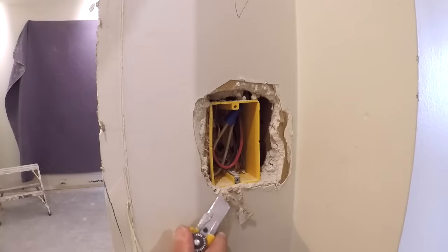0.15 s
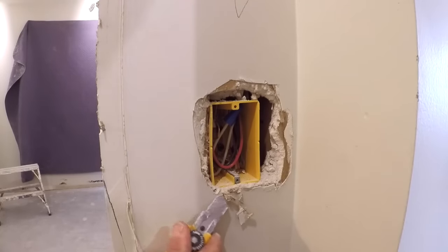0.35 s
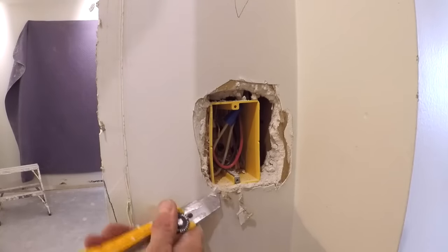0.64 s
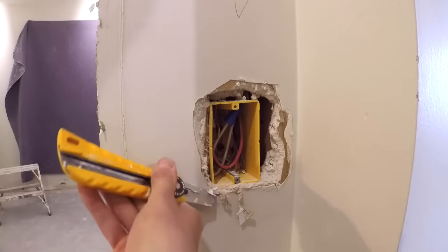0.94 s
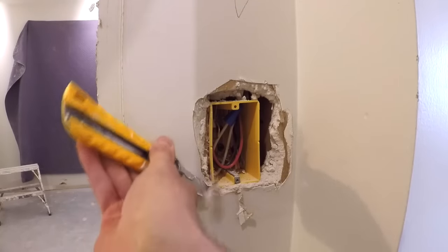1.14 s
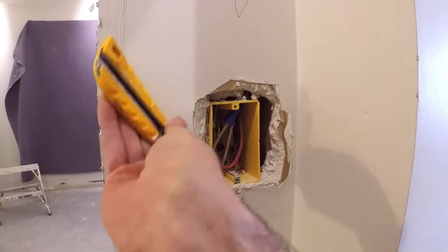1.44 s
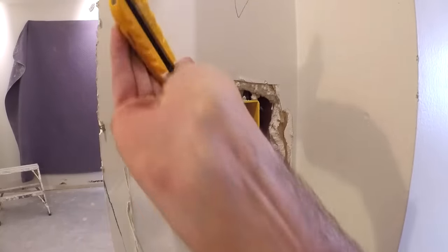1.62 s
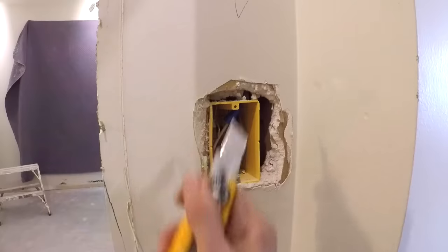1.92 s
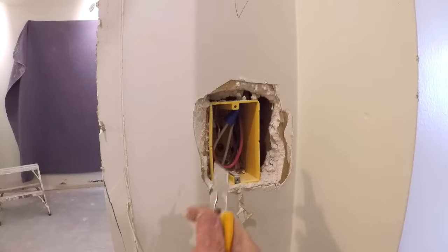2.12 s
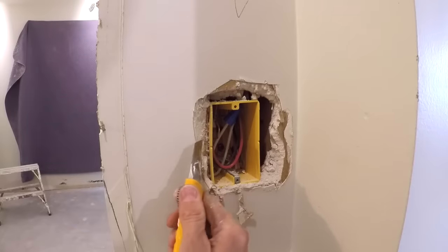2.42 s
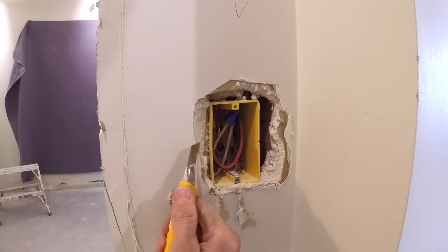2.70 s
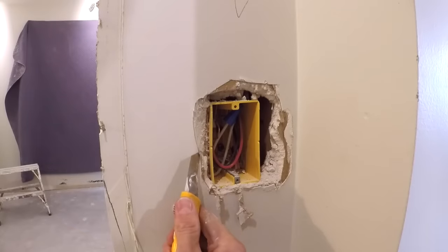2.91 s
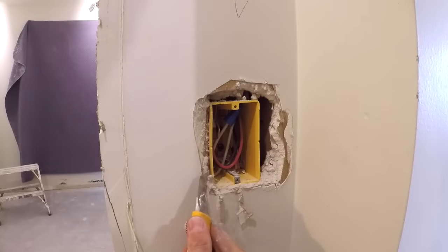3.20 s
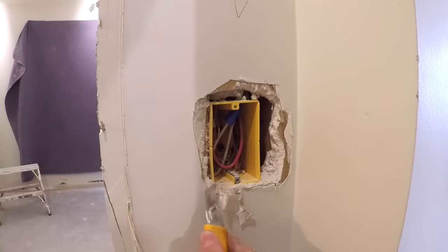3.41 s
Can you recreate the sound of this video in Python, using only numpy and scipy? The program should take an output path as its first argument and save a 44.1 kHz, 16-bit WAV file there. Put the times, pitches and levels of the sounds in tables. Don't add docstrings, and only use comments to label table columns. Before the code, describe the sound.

A utility knife scrapes crumbly gypsum and paper close to a worn microphone in a bare, lightly echoing room. Gritty crunches come at 0.03 and 0.45 s, dull mount knocks at 0.82, a crunch at 1.09, and a bright ringing blade squeak near 1.45-1.5 with a deep shove. Faint skids follow, then quiet; light scraping at 2.85, a crunch at 3.1, and the loudest dry snap with spitting crumbs at 3.36. Soft hiss and low rumble throughout.

```python
import sys
import numpy as np
from scipy import signal
from scipy.io import wavfile

SR = 44100
rng = np.random.default_rng(int(sys.argv[2]) if len(sys.argv) > 2 else 0)


def waveform_to_disk(signal):
    frames = np.transpose(np.atleast_2d(signal))
    scaled = np.clip(frames, -1, 1) * 32767
    samples = np.round(scaled).astype(np.int16)
    wavfile.write(sys.argv[1], SR, samples)


def volts(x):
    e = np.asarray(x, float) / 20
    return 10 ** e


N = 156555
STROKE_SAMPLES, TICK_SAMPLES = SR // 4, SR // 8
BAND_EDGES_HZ = 40 * 2 ** np.arange(0, 9.1, .5)


def rms_one(x):
    return x / np.sqrt(np.mean(x ** 2) + 1e-20)


def at_hz(points, hz):
    table = np.array(points)
    return np.interp(np.log(hz), np.log(table[:, 0]), table[:, 1])


def band(x, low, high):
    return signal.sosfilt(signal.butter(2, [low, high], "band", fs=SR, output="sos"), x)


def soften(x, order, hz):
    return signal.sosfilt(signal.butter(order, hz, fs=SR, output="sos"), x)


def coloured(pair, spectrum):
    bottom, top = spectrum[0][0], spectrum[-1][0]
    bands = [(a, b) for a, b in zip(BAND_EDGES_HZ, BAND_EDGES_HZ[1:]) if b > bottom and a < top]
    out, power = 0, 0
    for k, (low, high) in enumerate(bands):
        gain = volts(at_hz(spectrum, np.sqrt(low * high)))
        out = out + gain * band(pair[k % 2], low, high)
        power += gain ** 2 * (high - low) * 2 / SR
    return out / np.sqrt(power)


def rings(x, modes):
    out, power = 0, 0
    for k, (hz, db, t60) in enumerate(modes):
        r = volts(-60 / (t60 * SR))
        w = 2 * np.pi * hz / SR
        mode = signal.lfilter([0, np.sin(w)], [1, -2 * r * np.cos(w), r * r], x + 1e-18)
        out = out + (-1) ** k * volts(db) * mode
        power += volts(2 * db) / (2 * (1 - r * r))
    return out / np.sqrt(power)


def drift(rate_hz):
    r = np.exp(-2 * np.pi * rate_hz / SR)
    settle = 9000
    noise = rng.standard_normal(N + settle)
    return rms_one(signal.lfilter([1], [1, -2 * r, r * r], noise)[settle:])


def grains(clump_db=2.5):
    grains_per_s, spread_db = 8000, 3.8
    sizes = volts(spread_db * np.minimum(rng.exponential(1, (2, N)), 3.5))
    sizes = sizes * rng.choice([-1, 1], (2, N))
    breaks = rng.random((2, N)) < grains_per_s / SR
    return rms_one(sizes * breaks * volts(clump_db * drift(150)))


def swell(peak_s, rise_s, fall_s):
    t = np.arange(N) / SR
    return volts(-20 * np.where(t < peak_s, (peak_s - t) / rise_s, (t - peak_s) / fall_s))


def stroke(length_s):
    t = np.arange(STROKE_SAMPLES) / SR
    least_edge_s, edge_share = .003, .3
    edge_s = least_edge_s + edge_share * length_s
    return np.clip(np.minimum(t, length_s + least_edge_s - t) / edge_s, 0, 1)


def swelling_rings(events, cycles, gain_db):
    out, t = np.zeros(N + SR), np.arange(TICK_SAMPLES) / SR
    for start_s, level_db, hz in events:
        start, age = int(start_s * SR), t * hz / cycles
        shape = age * np.exp(1 - age)
        out[start:start + len(t)] += volts(level_db + gain_db) * shape * np.sin(2 * np.pi * hz * t)
    return out[:N]


# pitch_hz, level_db (per Hz)
HISS_COLOUR = [(70, -8), (300, -11), (600, -15), (1860, -20), (13000, -29), (17000, -34)]


def hiss():
    return volts(-67.2) * coloured(rng.standard_normal((2, N)), HISS_COLOUR)


# time_s, level_db
SWAY_LEVEL = [(0, -62), (.9, -62), (1.55, -60), (2.1, -62), (2.5, -57), (3.1, -59), (3.55, -62)]


def sway():
    slow_hz, top_hz, top_db = 12, 60, -8
    time_s, level_db = np.transpose(SWAY_LEVEL)
    slow = band(rng.standard_normal(N + SR), 4, slow_hz)
    slow = rms_one(band(slow, 3, 2 * slow_hz)[SR:])
    top = rms_one(band(rng.standard_normal(N + SR), 20, top_hz)[SR:])
    level = volts(np.interp(np.arange(N) / SR, time_s, level_db))
    return level * (slow + volts(top_db) * top)


# peak_s, level_db, cycle_s
BODY_HEAVES = [(.06, -46, .18), (.22, -52, .13), (.355, -41, .16), (.58, -42, .16), (.73, -53, .15),
               (.97, -52, .2), (1.22, -46, .15), (1.46, -46, .2), (1.62, -43, .17), (1.82, -49, .15),
               (1.97, -49, .14), (2.12, -46, .15), (3.13, -50, .14), (3.42, -51, .13)]


def heaves():
    out, t = 0, np.arange(N) / SR
    for peak_s, level_db, cycle_s in BODY_HEAVES:
        cycles = (t - peak_s) / cycle_s
        out = out + volts(level_db) * np.cos(2 * np.pi * cycles) * np.exp(-.5 * (cycles / .45) ** 2)
    return out


# start_s, level_db, pitch_hz
MOUNT_KNOCKS = [
    (.447, -42, 90),
    (.817, -41, 250),
    (.821, -36, 230),
    (.829, -39, 260),
    (.836, -40, 60),
    (.842, -39, 45),
    (.864, -45, 200),
    (1.522, -33, 22),
    (1.548, -40, 40),
]


def knocks():
    out = np.zeros(N)
    for k, (start_s, level_db, hz) in enumerate(MOUNT_KNOCKS):
        start, phase = int(start_s * SR), np.arange(TICK_SAMPLES) / SR * hz
        decay = volts(level_db - 60 * phase / 2.5)
        out[start:start + len(phase)] += decay * np.sin(2 * np.pi * phase) * (-1) ** k
    return out


# peak_s, level_db, rise_s (per 20 dB), fall_s (per 20 dB)
HAND_BUMPS = [
    (.04, -45, .03, .09),
    (.46, -49, .02, .1),
    (.82, -49, .006, .07),
    (.88, -60, .03, .08),
    (1.55, -53, .08, .12),
    (1.15, -62, .08, .1),
    (2.42, -62, .1, .1),
    (3.11, -55, .06, .15),
    (3.375, -46, .015, .12),
]
# pitch_hz, level_db (per Hz)
BUMP_COLOUR = [(40, -9), (80, -2), (170, -1), (400, -5), (800, -24)]


def bumps():
    force = sum(volts(level_db) * swell(peak_s, rise_s, fall_s) for peak_s, level_db, rise_s, fall_s in HAND_BUMPS)
    return coloured(grains() * force, BUMP_COLOUR)


# start_s, length_s, level_db, pitch_hz
PAPER_SQUEAKS = [
    (.105, .06, -70, 3100),
    (.462, .02, -55, 4400),
    (.55, .09, -63, 1720),
]


def squeaks(fine):
    out = np.zeros(N)
    for start_s, length_s, level_db, hz in PAPER_SQUEAKS:
        span = slice(int(start_s * SR), int(start_s * SR) + STROKE_SAMPLES)
        out[span] += volts(level_db) * rings(fine[1, span] * stroke(length_s), [(hz, 0, .08)])
    return out


# start_s, length_s, hiss_db, pitch_factor, ring_db
BLADE_SKIDS = [(.63, .2, -66, 1.95, -74), (.89, .015, -70, 1.0, -74), (1.017, .015, -71, 1.05, -68),
               (1.28, .12, -69, 1.0, -72), (1.38, .09, -61, 1.0, -62), (1.44, .08, -52, 1.0, -46),
               (1.455, .05, -58, 1.0, -50), (1.51, .05, -60, .98, -57), (1.56, .08, -67, 1.0, -68),
               (1.603, .028, -66, .9, -63), (1.663, .04, -70, .82, -62), (1.663, .04, -70, 1.09, -62),
               (1.665, .035, -70, 1.5, -65), (1.886, .02, -64, .74, -71), (1.944, .012, -73, .85, -71),
               (2.09, .024, -62, .85, -72), (2.11, .07, -69, .85, -80), (2.8, .11, -64, 1.1, -74),
               (3.27, .09, -64, 1.1, -76), (3.346, .014, -55, 1.3, -60)]
# pitch_hz, level_db (per Hz)
SKID_COLOUR = [(2300, -12), (3800, -3), (6000, -5), (8800, -5), (11000, -14), (15500, -21)]
# pitch_hz, width_hz, level_db
BLADE_MODES = [(3980, 350, 1), (4300, 250, -1), (5400, 400, -9), (6050, 500, -7), (8250, 500, -5),
               (9100, 500, -10)]


def skids(fine):
    ringing, rubbing = np.zeros(N + SR), np.zeros((2, N + SR))
    fine = np.tile(fine, 2)
    for start_s, length_s, hiss_db, factor, ring_db in BLADE_SKIDS:
        span = slice(int(start_s * SR), int(start_s * SR) + STROKE_SAMPLES)
        force = fine[:, span] * stroke(length_s)
        modes = [(min(hz * factor, .4 * SR), level_db, 2.2 / width_hz) for hz, width_hz, level_db in BLADE_MODES]
        ringing[span] += volts(ring_db) * rings(force[0], modes)
        rubbing[:, span] += volts(hiss_db) * force
    return (ringing + coloured(rubbing, SKID_COLOUR))[:N]


# start_s, level_db, pitch_hz
BLADE_CHIRPS = [(.0205, -38, 5300), (.0225, -38, 3100), (.0495, -42, 3200), (.4475, -37, 6300),
                (.454, -37, 3400), (.4565, -38, 6200), (.4975, -50, 6600), (.504, -55, 9800),
                (.510, -48, 7000), (.5295, -54, 9000), (.531, -52, 5200), (1.0645, -44, 5280),
                (1.0725, -42, 8700), (1.081, -37, 4900), (1.0855, -34, 4000), (1.096, -42, 5100),
                (1.4535, -44, 8600), (1.460, -42, 6200), (1.468, -33, 4020), (1.474, -35, 4300),
                (1.4785, -36, 4200), (1.484, -39, 4100), (1.4893, -29, 4020), (1.4955, -33, 4250),
                (1.4995, -40, 3900), (1.539, -45, 4100), (1.544, -46, 4200), (2.8574, -50, 8930),
                (3.0445, -44, 5600), (3.087, -42, 5020), (3.0905, -46, 9600), (3.0994, -39, 4980),
                (3.115, -43, 5700), (3.359, -28, 8400), (3.3665, -33, 7800), (3.378, -37, 8300),
                (3.494, -50, 6100)]


def chirps():
    return swelling_rings(BLADE_CHIRPS, cycles=3.4, gain_db=-3)


# start_s, level_db, pitch_hz
BOARD_TAPS = [(.0245, -42, 800), (.030, -37, 490), (.036, -39, 500), (.0415, -40, 340), (.053, -42, 500),
              (.065, -45, 500), (.071, -45, 700), (.238, -55, 509), (.462, -41, 363), (.473, -41, 320),
              (.490, -45, 330), (.506, -41, 490), (.516, -44, 480), (.530, -47, 400), (.677, -53, 624),
              (1.083, -39, 1450), (1.0855, -38, 743), (1.091, -40, 900), (1.101, -42, 740),
              (1.472, -48, 756), (1.495, -46, 500), (2.806, -58, 503), (3.056, -42, 487), (3.063, -40, 500),
              (3.067, -44, 330), (3.1005, -38, 1590), (3.104, -36, 506), (3.110, -37, 500),
              (3.117, -37, 520), (3.128, -44, 335), (3.294, -52, 503)]


def taps():
    return swelling_rings(BOARD_TAPS, cycles=1.0, gain_db=-2)


# peak_s, grit_db, board_db, rise_s (per 20 dB), fall_s (per 20 dB)
GYPSUM_CUTS = [(.027, -44.5, -45, .018, .06), (.26, -65, -59, .08, .05), (.449, -38.5, -45, .006, .035),
               (.515, -61, -58, .04, .06), (.695, -66, -58, .08, .08), (1.088, -41, -44, .025, .03),
               (1.072, -49, -53, .012, .03), (.415, -66, -66, .02, .05), (.59, -68, -67, .06, .08),
               (1.42, -66, -62, .1, .05), (1.485, -50, -51, .05, .05), (1.55, -58, -51, .05, .05),
               (2.575, -72, -66, .03, .03), (2.868, -61, -58, .08, .06), (3.052, -54, -60, .02, .05),
               (3.065, -55, -53, .03, .06), (3.105, -44, -45, .035, .035), (3.315, -64, -61, .07, .15),
               (3.49, -60, -56, .03, .03)]
# pitch_hz, level_db (per Hz)
GRIT_COLOUR = [(1000, -8), (1600, -2), (4800, -3), (8500, -10), (10700, -18), (14000, -21), (17000, -30)]
# pitch_hz, level_db (per Hz)
BOARD_COLOUR = [(60, -16), (170, -8), (500, -2), (800, -3), (1500, -8), (3000, -16)]
# pitch_hz, level_db, t60_s
BOARD_RINGS = [(170, -6, .12), (318, -2, .12), (495, 0, .14), (517, 2, .16), (738, 0, .08), (894, -5, .06),
               (1238, -6, .06), (1450, -4, .05), (2200, -7, .04), (3100, -10, .05)]


def cuts():
    grit_level, board_level = 0, 0
    for peak_s, grit_db, board_db, rise_s, fall_s in GYPSUM_CUTS:
        shape = swell(peak_s, rise_s, fall_s)
        grit_level = grit_level + volts(grit_db) * shape
        board_level = board_level + volts(board_db) * shape
    push = grains() * board_level
    grit = coloured(grains() * grit_level, GRIT_COLOUR)
    return grit + coloured(push, BOARD_COLOUR) + volts(-3) * rings(push[0], BOARD_RINGS)


# start_s, level_db
SNAP_BREAKS = [
    (3.3594, -1),
    (3.3607, -8),
    (3.3635, -11),
    (3.366, -12),
    (3.3695, -10),
    (3.3715, -13),
    (3.376, -15),
]
# pitch_hz, level_db (per Hz)
SNAP_BODY = [(60, -14), (340, -3), (800, -8), (1400, -2), (2300, -14), (4500, -17), (8500, -24),
             (11000, -42)]
# pitch_hz, level_db, t60_s
SNAP_RINGS = [(321, 1, .2), (362, -7, .1), (508, 2, .15), (921, -8, .08), (1178, -4, .1), (1255, -1, .12),
              (1400, 0, .1), (1580, -2, .09), (2110, -3, .06), (2730, -9, .05)]
# pitch_hz, level_db, t60_s
CRACK_RINGS = [(1450, 0, .006), (2050, -4, .006), (4900, -12, .002)]
# pitch_hz, level_db (per Hz)
SPIT_COLOUR = [(2000, -4), (3000, 0), (5000, -4), (8500, -5), (10500, -22), (14000, -24), (16000, -36)]


def snap():
    soft_hz, rattle_db, rattle_s, spit_db, spit_s = 4500, -26, .03, -27.5, .026
    snap_s = SNAP_BREAKS[0][0]
    t = np.arange(N) / SR - snap_s
    clicks, crumbs = np.zeros(N), grains()
    for k, (start_s, level_db) in enumerate(SNAP_BREAKS):
        clicks[int(start_s * SR)] = volts(level_db) * (-1) ** k
    clicks = soften(clicks, 4, soft_hz)
    rattle = crumbs * volts(rattle_db - 20 * np.abs(t) / rattle_s) * (t > 0)
    force = clicks + rattle
    spit = coloured(crumbs[::-1] * volts(spit_db) * swell(snap_s, .0012, spit_s), SPIT_COLOUR)
    ring = soften(rings(force[0], SNAP_RINGS), 2, soft_hz)
    crack = rings(clicks, CRACK_RINGS)
    return coloured(force, SNAP_BODY) + volts(-5) * ring + volts(-3) * crack + spit


# pitch_hz, t60_s
ROOM_DECAY = [(100, .45), (500, .5), (2000, .42), (6000, .3), (14000, .14)]


def room(x):
    t = np.arange(SR // 2) / SR
    white, tail = rng.standard_normal((2, len(t))), 0
    for k, (low, high) in enumerate(zip(BAND_EDGES_HZ, BAND_EDGES_HZ[1:])):
        t60_s = at_hz(ROOM_DECAY, np.sqrt(low * high))
        tail = tail + band(white[k % 2], low, high) * volts(-60 * t / t60_s)
    tail = tail * (t > .004)
    return signal.fftconvolve(x, tail / np.sqrt(np.sum(tail ** 2)))[:N]


def scene():
    fine = grains(1.1)
    skid = skids(fine) + squeaks(fine)
    wall = cuts() + snap()
    tick = chirps() + taps()
    noise = hiss()
    echo = volts(-8) * room(wall + volts(-4) * skid + volts(-7) * tick)
    handling = bumps() + knocks() + sway() + heaves()
    return (skid + wall + tick + echo + handling + noise)[None]


def low_pass(x):
    return signal.sosfilt(signal.butter(12, 15860, fs=SR, output="sos"), x)


def record(dry):
    return low_pass(dry)


dry = scene()
out = record(dry)
waveform_to_disk(out)
```